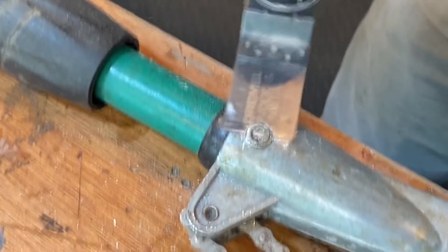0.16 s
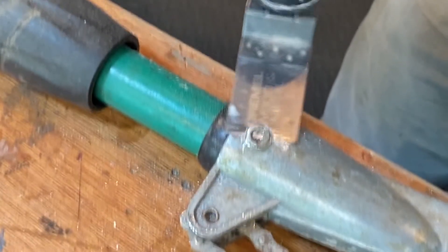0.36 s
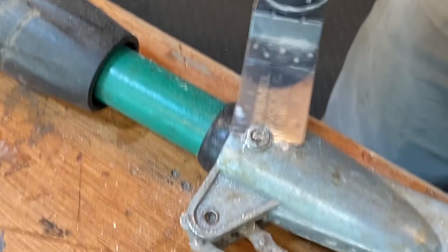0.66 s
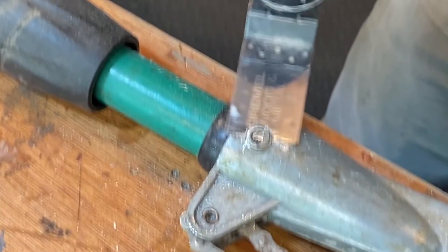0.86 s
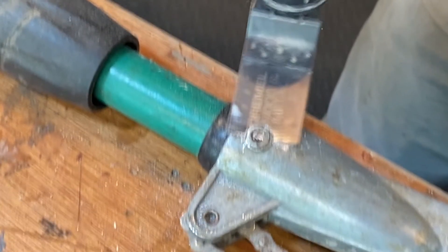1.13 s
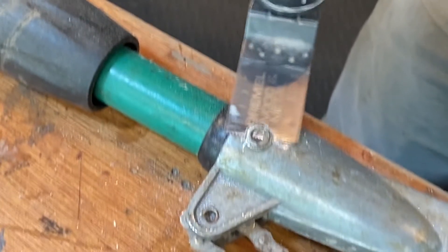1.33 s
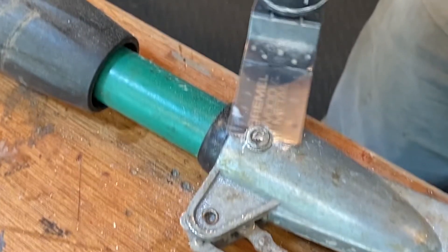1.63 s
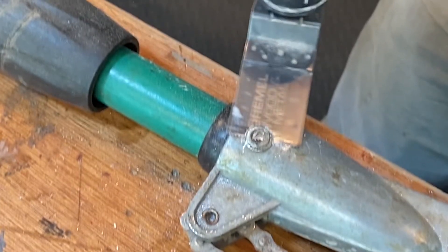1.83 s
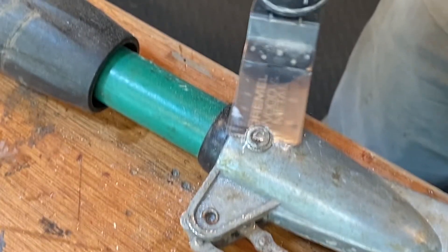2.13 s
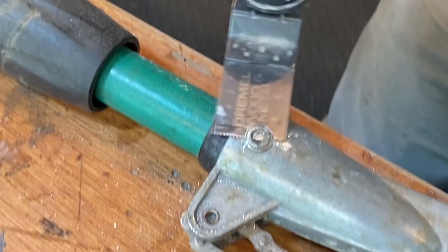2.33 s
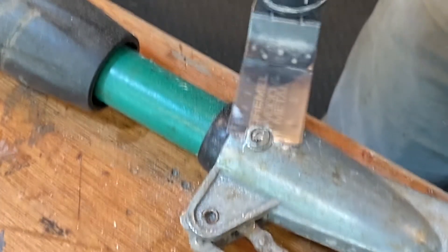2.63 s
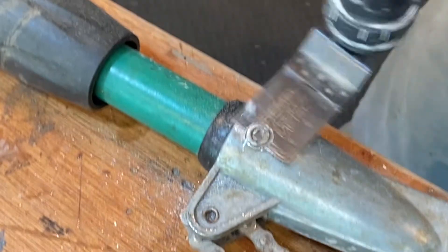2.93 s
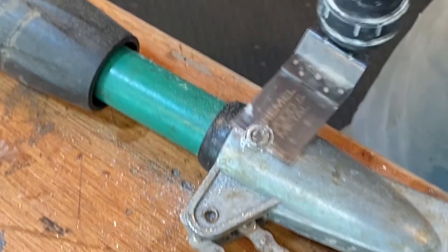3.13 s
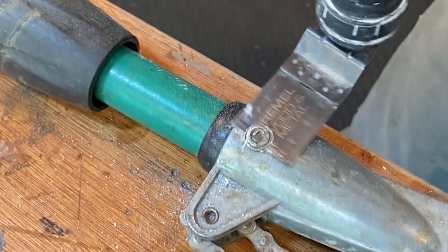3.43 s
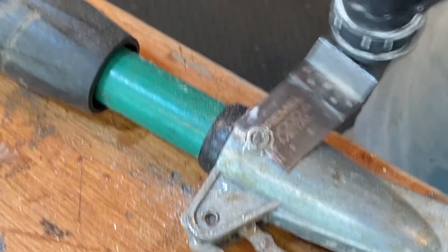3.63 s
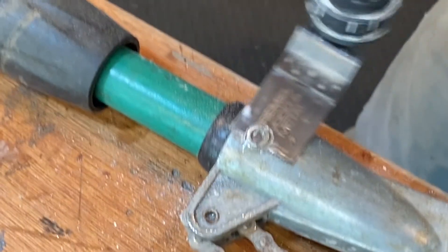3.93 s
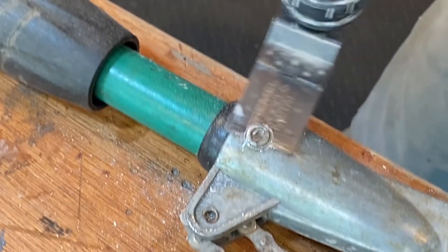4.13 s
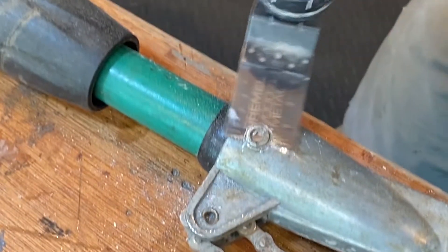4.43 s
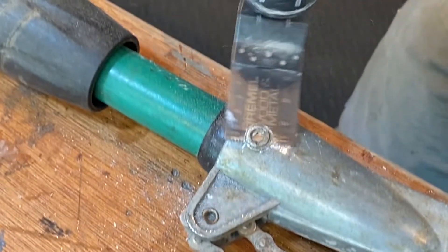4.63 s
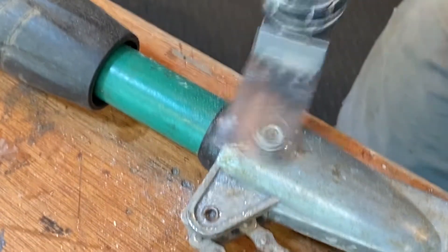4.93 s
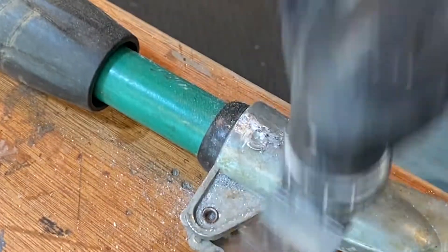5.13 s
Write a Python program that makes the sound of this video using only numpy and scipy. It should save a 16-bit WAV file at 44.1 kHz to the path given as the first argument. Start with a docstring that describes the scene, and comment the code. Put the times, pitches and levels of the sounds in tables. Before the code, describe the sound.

An oscillating power tool saws at a metal pin on a wooden workbench, heard from very close. A low, wavering hum carries a metallic buzz, a gritty rasp and a high sizzling hiss. About halfway through, the blade bites harder and the grinding turns louder and harsher, its pitch sagging and recovering, with a few faint thumps from the bench. At the end the blade lifts off and the sound falls away sharply.

```python
"""An oscillating tool saws a metal pin on a wooden bench, first upright, then tilted and pressed harder.
Each swing of the blade drags teeth over the pin (rasp, hiss and sizzling chips), knocks the workpiece,
its collar and its clamp (buzz) and shakes the bench (hum). Snags make the bench thump, and at the end
the blade lifts off. It is heard close by, and left and right differ in colour and timing."""
import sys
import numpy as np
from scipy import signal
from scipy.fft import rfft, irfft, next_fast_len
from scipy.io import wavfile
from scipy.ndimage import uniform_filter1d

SR = 44100
rng = np.random.default_rng(int(sys.argv[2]) if len(sys.argv) > 2 else 0)


def inscribe(sig):
    """Save sig as 16-bit PCM at rate SR to the path in sys.argv[1].

    A 1-D sig is mono; a 2-D sig holds one channel per row.
    Samples are clipped to [-1, 1] before scaling.
    """
    pcm = np.round(np.clip(np.atleast_2d(sig).T, -1, 1) * 32767)
    wavfile.write(sys.argv[1], SR, pcm.astype(np.int16))


N = 232710
TIME_S = np.arange(N) / SR
TILT_S = 2.981   # the blade is set at a new angle
UPRIGHT, TILTED = 1, 2   # each angle's column in the tables of pitch_hz, upright_db, tilted_db


def from_db(db):
    """Turn decibels into a gain."""
    return 10 ** (np.asarray(db) / 20)


def rms_one(sound):
    """Scale a sound to an average power of 1."""
    return sound / np.sqrt(np.mean(sound ** 2) + 1e-20)


def in_time(rows):
    """Join a table's timed points with lines: one value a sample for each column."""
    times_s, *columns = np.transpose(rows)
    return [np.interp(TIME_S, times_s, column) for column in columns]


def at_pitch(rows, hz, column=1):
    """Read a table between its rows, on a logarithmic pitch scale."""
    rows = np.array(rows)
    return np.interp(np.log(hz + 1), np.log(rows[:, 0] + 1), rows[:, column])


def by_angle(upright, tilted):
    """One value before the blade tilts, another after."""
    return np.where(TIME_S >= TILT_S, tilted, upright)


def drift(rate_hz):
    """A smooth random wobble, about 1 in size."""
    pole = np.exp(-40 * np.pi * rate_hz / SR)   # one step every 20 samples
    slow = signal.lfilter([1], [1, -2 * pole, pole ** 2], rng.standard_normal(N // 20 + 2002))[2000:]
    return np.interp(np.arange(N) / 20, np.arange(len(slow)), rms_one(slow))


# How much louder left is than right: pitch_hz, upright_db, tilted_db
LEFT_LOUDER = [(200, 0.5, 0.7), (380, -3, -3), (700, 7, 3), (1250, 1, -1), (2800, 1, 0), (3800, 10, 4),
               (5000, 14, 8), (6200, 8, 4), (7000, 0, 2), (8200, 0, 0)]
# How far the left channel leads, in steps through the treble: pitch_hz, lead_radians
LEFT_LEAD = [(0, .3), (250, .5), (520, 1.6), (1210, .3), (3530, 1.9), (5250, 1.5), (6030, -1), (7500, -1.6),
             (8000, -3), (8500, -3.3), (10400, -6.1), (11500, -6.4), (12900, -9.3), (13700, -9.5),
             (15500, -12.5)]
def left_right(hz, angle):
    """Each pitch sounds at a different strength and moment on the left and on the right."""
    lead = np.interp(hz, *np.transpose(LEFT_LEAD))
    left = from_db(at_pitch(LEFT_LOUDER, hz, angle) / 2) * np.exp(.5j * lead)
    return np.array([left, 1 / left])


# How alike left and right sound at each pitch: pitch_hz, share_0_to_1
LIKENESS = [(200, .97), (330, .3), (1000, .4), (1250, .75), (3200, .6), (4000, .4), (7500, .55),
            (8200, .92), (9800, .8), (10800, .99), (12000, .65), (13400, .99), (14800, .85), (15600, .96)]
def heard(grit, response, gain):
    """A body colours the grit: one stream sounds on both sides, and each side has one of its own."""
    size = next_fast_len(N + 4096)
    hz = np.arange(size // 2 + 1) * SR / size
    share = np.clip(at_pitch(LIKENESS, hz), 0, 1)
    out = 0
    for angle, active in ((UPRIGHT, TIME_S < TILT_S), (TILTED, TIME_S >= TILT_S)):
        common, *own = rfft(grit * gain * active, size)
        body = response(hz, angle)
        both = left_right(hz, angle)
        common_power = share * np.abs(np.mean(both, axis=0)) ** 2
        own_power = (1 - share) * np.mean(np.abs(both) ** 2, axis=0) / 2
        # the body sets only the colour, not the loudness
        body = body / np.sqrt(np.mean(np.abs(body) ** 2 * (common_power + own_power)))
        mixed = np.sqrt(share) * common + np.sqrt(1 - share) * np.array(own)
        out = out + irfft(mixed * body * both, size)[:, :N]
    return out


def resonances(tones, hz, angle):
    """A metal part answers most strongly near its own tones, which alternate in sign."""
    return sum((-1) ** k * from_db(tone[angle + 1])
               / (1 + 1j * (hz ** 2 - tone[0] ** 2) / (tone[1] * hz + 1)) ** 2
               for k, tone in enumerate(tones))


def buzz(tones, phase, swing_hz, multiples):
    """Even knocks make multiples of the swing rate, loudest near the part's own tones."""
    step = 64   # samples between updates of the colour
    tilted = TIME_S[::step] >= TILT_S
    out, power = 0, 0
    for k in multiples:
        hz = k * swing_hz[::step]
        body = np.where(tilted, resonances(tones, hz, TILTED) * left_right(hz, TILTED),
                        resonances(tones, hz, UPRIGHT) * left_right(hz, UPRIGHT))
        unshared = 1 - np.clip(at_pitch(LIKENESS, hz), 0, 1)
        apart = 1.39 * unshared * drift(2.13)[::step]   # left and right do not keep step
        waver = from_db(2.5 * drift(5)) * np.exp(1j * (.3 + .015 * k) * drift(5))
        body = body * np.exp(1j * apart * [[1], [-1]])
        power = power + np.abs(np.mean(body, axis=0)) ** 2 / 2
        body = np.repeat(body * waver[::step], step, axis=1)[:, :N]
        out = out + (body * np.exp(1j * k * phase)).real
    return out / np.sqrt(uniform_filter1d(np.repeat(power, step)[:N], size=4000))


def shaken(tones, level_db, grit, steady, grit_share):
    """A metal part rings partly from random grit and partly with a steady buzz."""
    grit_share = np.clip(grit_share, 0, .97)
    gain = from_db(level_db)
    grind = heard(grit, lambda hz, angle: resonances(tones, hz, angle), gain * np.sqrt(grit_share))
    return grind + gain * np.sqrt(1 - grit_share) * steady


# The blade snags and the bench jumps: start_s, level_db
SNAGS = [(.66, -34), (2.35, -40), (2.499, -41), (2.979, -26), (3.049, -32), (3.619, -34), (3.72, -41),
         (4.309, -26), (4.6, -42), (5.049, -32), (5.168, -29)]
def bench_thumps(pitch_hz=70, ring_s=0.076):
    """Each snag sets the bench top swinging a few times."""
    kicks = np.zeros(N)
    for start_s, level_db in SNAGS:
        kicks[round(start_s * SR)] = from_db(level_db)
    decay = from_db(-60 / (ring_s * SR))
    turn = 2 * np.pi * pitch_hz / SR
    return signal.lfilter([0, np.sin(turn)], [1, -2 * decay * np.cos(turn), decay ** 2], kicks + 1e-18)


def bench_rumble(rough, rise_s=0.008, fall_s=0.045):
    """A rough cut and every snag shake the bench under the microphone."""
    low_band = signal.butter(3, [55, 110], "band", fs=SR, output="sos")
    middle, side = signal.sosfilt(low_band, rng.standard_normal((2, N)))
    shudder = 0
    for start_s, level_db in SNAGS:
        fade_s = np.where(TIME_S < start_s, rise_s, fall_s)
        shudder = shudder + from_db(level_db - 0.5) * np.exp(-np.abs(TIME_S - start_s) / fade_s)
    gain = (from_db(-70 + 30 * rough) + shudder) * from_db(2.1 * drift(9.9))
    return gain * rms_one(middle + 0.21 * side * [[1], [-1]])


# How the bench answers at twice the swing rate: pitch_hz, upright_db, tilted_db
BENCH_ANSWER = [(208.5, -47, -40), (228.4, -47, -25), (253.4, -43, -44), (279, -49.5, -46),
                (270.5, -46, -41), (298, -50.5, -32), (330, -50, -53)]
def bench_hum(phase, swing_hz, rough, hum_db, third_db):
    """The bench shakes at one, two and three times the swing rate; a rough cut makes it lumpy."""
    second_db = by_angle(at_pitch(BENCH_ANSWER, 2 * swing_hz, UPRIGHT),
                         at_pitch(BENCH_ANSWER, 2 * swing_hz, TILTED)) + 2.0 * drift(9.0)
    out = 0
    for k, level_db in enumerate([hum_db, second_db, third_db], 1):
        wave = np.exp(1j * (k * phase + .5 * rough * drift(32.5)))
        gain = np.sqrt(2) * from_db(level_db + 1.6 * rough * drift(25))
        both = left_right(k * swing_hz, TILTED)   # the hum uses this balance at both angles
        out = out + gain * (wave * both / np.abs(np.mean(both, axis=0))).real
    return out


# How hard the swing knocks the metal: time_s, workpiece_db, collar_db, clamp_db
KNOCK_LEVELS = [(0, -30, -30, -28.5), (.33, -30, -34.5, -33.5), (.5, -28.5, -30, -34),
                (.99, -34.5, -36.5, -35.5), (1.16, -33, -37.5, -33), (1.38, -30.5, -31.5, -32.5),
                (1.51, -28.5, -30.5, -33), (1.71, -38, -39, -31), (1.83, -33.5, -31, -32.5),
                (1.96, -41, -34, -30.5), (2.14, -35, -33.5, -32), (2.31, -40, -33, -29),
                (2.42, -30.5, -33.5, -34), (2.55, -33.5, -28.5, -30.5), (2.72, -29.5, -39.5, -35.5),
                (2.82, -38.5, -27, -33), (2.975, -38, -32, -44), (2.99, -22.5, -28, -24.5),
                (3.05, -23.5, -17.5, -21), (3.11, -21.5, -20.5, -24), (3.2, -22, -18.5, -14.5),
                (3.29, -16.5, -16, -18.5), (3.5, -24.5, -18, -18), (3.56, -30.5, -20.5, -24.5),
                (3.62, -19.5, -20.5, -17), (3.78, -25, -29, -25), (3.93, -26.5, -22, -22.5),
                (4.1, -22, -29, -22), (4.28, -22, -17.5, -16), (4.45, -21, -21, -20.5),
                (4.5, -24, -26, -21), (4.56, -23, -19, -21), (4.63, -22, -23.5, -24),
                (4.9, -28.5, -23.5, -27.5), (4.98, -22, -20.5, -19.5), (5.11, -24, -21.5, -24.5),
                (5.135, -32.5, -40, -42), (5.28, -44, -41, -44)]
def knock_levels(waver_db=1.0):
    """The knocking on each part swells and fades a little by chance."""
    return [level_db + waver_db * drift(11.0) for level_db in in_time(KNOCK_LEVELS)]


# The workpiece's tones: pitch_hz, width_hz, upright_db, tilted_db
WORKPIECE_TONES = [(227, 200, -13, -10), (415, 217, -1, -6), (544, 73, -2.5, -1.5), (677.4, 116, 6.5, 3),
                   (878, 147, 5, 1.5)]
def workpiece_buzz(level_db, knocks, phase, swing_hz, rough):
    """The knocked workpiece rings low, and grinds more when the cut is rough."""
    steady = buzz(WORKPIECE_TONES, phase, swing_hz, multiples=range(4, 10))
    return shaken(WORKPIECE_TONES, level_db, knocks, steady, grit_share=.04 + 1.1 * rough)


# The collar's tones: pitch_hz, width_hz, upright_db, tilted_db
COLLAR_TONES = [(1036, 88, -4, -1.5), (1197, 140, 10.5, 13), (1338, 73, 5.5, 13), (1456, 175, 6, 7)]
def collar_buzz(level_db, knocks, phase, swing_hz, rough):
    """The same knocks ring the collar around the pin at a middle pitch."""
    steady = buzz(COLLAR_TONES, phase, swing_hz, multiples=range(6, 15))
    return shaken(COLLAR_TONES, level_db, knocks, steady, grit_share=.06 + 1.05 * rough)


# The clamp's tones: pitch_hz, width_hz, upright_db, tilted_db
CLAMP_TONES = [(1720, 253, -8.5, 0), (1965, 220, -5, -1.5), (2366, 650, -8, -0.5), (2690, 510, -13.5, -4),
               (3080, 460, -8.5, 1.5)]
def clamp_buzz(level_db, knocks, phase, swing_hz, rough):
    """The clamp rings higher, so less of its sound repeats from swing to swing."""
    steady = buzz(CLAMP_TONES, phase, swing_hz, multiples=range(10, 29))
    return shaken(CLAMP_TONES, level_db, knocks, steady, grit_share=.27 + 1.2 * rough)


# The colour of the sizzle: pitch_hz, upright_db, tilted_db
CHIP_COLOUR = [(11800, -14, -10), (12460, 6.5, 0.5), (13700, 6, 7.5), (14940, 10, 8.5), (16400, -34.5, -5)]
def chip_sizzle(bite_db, teeth, burst_db=12, burst_s=0.06):
    """A harder bite throws more chips; the fresh cut after the tilt spits a burst of them."""
    fresh_cut_db = by_angle(0, burst_db * np.exp(-np.abs(TIME_S - TILT_S) / burst_s))
    level_db = -32 + 1.2 * (bite_db + 28.5) + fresh_cut_db
    return heard(teeth, lambda hz, angle: from_db(at_pitch(CHIP_COLOUR, hz, angle)), from_db(level_db))


# How hard the teeth bite: time_s, level_db
BITE_LEVELS = [(0, -33.5), (.32, -35), (.57, -36), (.64, -37), (.8, -34), (.99, -36.5), (1.09, -26.5),
               (1.17, -24.5), (1.31, -33), (1.36, -35.5), (1.49, -31.5), (1.6, -38.5), (1.71, -28.5),
               (1.83, -37.5), (1.96, -29.5), (2.12, -34.5), (2.3, -25.5), (2.5, -34), (2.6, -29.5),
               (2.7, -33.5), (2.975, -40.5), (2.99, -24.5), (3.05, -21), (3.11, -26.5), (3.2, -20),
               (3.3, -23), (3.5, -19.5), (3.56, -26), (3.61, -19), (3.77, -31), (3.85, -28), (3.89, -23),
               (4.1, -20), (4.2, -27.5), (4.27, -17.5), (4.45, -23), (4.55, -20), (4.61, -31),
               (4.67, -26.5), (4.9, -28), (4.98, -17), (5.11, -27.5), (5.13, -38.5), (5.28, -45)]
def tooth_bite(waver_db=.7):
    """The depth of the bite, with a slight waver, sets how loud the teeth are."""
    return in_time(BITE_LEVELS)[0] + waver_db * drift(2.8)


def scraping(phase, rough, catches_per_s, spread_db, sharpness, return_db, patchy_db):
    """Teeth catch at random, hardest in the middle of each stroke, making three streams of grit."""
    forward = np.exp(sharpness * (1 - .5 * rough) * (np.cos(phase) - 1))
    back = from_db(return_db) * np.exp(sharpness * (-np.cos(phase) - 1))
    depth = from_db(patchy_db * (drift(39) + drift(6.7)))   # some strokes bite deeper
    caught = rng.random(N) < catches_per_s / SR
    strength = from_db(spread_db * np.minimum(rng.exponential(1, N), 5))
    grit = caught * strength * rng.standard_normal((3, N)) * (forward + back) * depth
    power = uniform_filter1d(np.mean(grit ** 2, axis=0), size=6000)
    return grit / np.sqrt(power + 1e-12)


# The colour of the hiss: pitch_hz, upright_db, tilted_db
TOOTH_COLOUR = [(5740, -42, -25), (6280, 9, 4), (7700, 21.5, 11.5), (9000, 27.5, 11.5), (10200, 13.5, 6),
                (9170, -7.5, -8), (10540, 13.5, 9), (12630, 8.5, -1), (12700, -28, -39)]
def tooth_hiss(bite_db, teeth):
    """Thousands of tiny catches on the pin blur into a high hiss."""
    return heard(teeth, lambda hz, angle: from_db(at_pitch(TOOTH_COLOUR, hz, angle)), from_db(bite_db))


# The blade's tones: pitch_hz, width_hz, upright_db, tilted_db
BLADE_TONES = [(3538, 430, 2, 4), (4130, 610, 9, -1), (4716, 380, 8.5, -1.5), (5190, 710, 5, -2.5),
               (5840, 770, 3.5, -6), (6490, 270, 1, -1)]
# How much the blade rings with the bite: time_s, above_hiss_db
RASP_LEVELS = [(0, 5), (.55, 5), (.64, -1), (.85, 4), (1.1, 4.5), (1.2, 2), (1.43, -1), (1.52, 4),
               (1.7, 1.5), (2.12, -4), (2.3, -7), (2.6, -1.5), (2.75, -3.5), (2.9, -1.5), (3.0, 0.5),
               (3.7, 1.5), (3.8, -1.5), (3.88, 1), (4.1, -1), (4.2, 3), (4.28, -1.5), (4.45, 1),
               (4.62, 3.5), (4.9, 2.5), (5.28, -3.5)]
def blade_rasp(bite_db, teeth, phase, swing_hz, rough):
    """The dragging teeth make the blade ring with a bright, gritty rasp."""
    level_db = bite_db + in_time(RASP_LEVELS)[0]
    steady = buzz(BLADE_TONES, phase, swing_hz, multiples=range(24, 44))
    return shaken(BLADE_TONES, level_db, teeth, steady, grit_share=.65 + .8 * rough)


# The swing while upright, tilted, then lifted off and running free:
# time_s, swing_hz, hum_db, third_multiple_db, roughness_0_to_1
SWING_UPRIGHT = [(0.0, 136.9, -17, -38, 0.3), (0.12, 136.9, -22, -49, 0.39), (0.3, 139.5, -18, -40, 0.36),
                 (0.4, 136.3, -21, -45, 0.32), (0.51, 142.7, -16, -35, 0.49), (0.54, 142.8, -18, -49, 0.65),
                 (0.64, 138.6, -17, -32, 0.29), (0.76, 142.4, -18, -49, 0.42),
                 (0.89, 140.1, -21, -39, 0.27), (0.93, 141.3, -20, -55, 0.37), (1.0, 143.9, -20, -35, 0.02),
                 (1.16, 140.7, -21, -43, 0.03), (1.19, 142.7, -21, -57, 0.25),
                 (1.25, 139.0, -18, -46, 0.11), (1.36, 142.6, -23, -38, 0.35),
                 (1.46, 145.2, -21, -50, 0.19), (1.67, 146.4, -29, -61, 0.05),
                 (1.98, 145.5, -26, -48, 0.06), (2.04, 149.5, -34, -51, 0.04),
                 (2.21, 147.9, -29, -41, 0.02), (2.28, 145.3, -33, -62, 0.37),
                 (2.37, 144.8, -24, -43, 0.38), (2.47, 134.5, -17, -36, 0.7), (2.5, 136.0, -29, -39, 0.78),
                 (2.56, 142.5, -20, -38, 0.57), (2.74, 138.9, -17, -47, 0.31),
                 (2.85, 152.0, -27, -45, 0.06), (2.87, 150.0, -42, -53, 0.02), (2.98, 139.0, -22, -46, 0.3)]
SWING_TILTED = [(2.98, 116, -41, -28, 0.086), (3.14, 114, -17.5, -32, 0.43), (3.2, 144.1, -18.5, -30, 0.52),
                (3.25, 142.8, -15, -34, 0.19), (3.29, 126.9, -16.5, -43, 0.52),
                (3.33, 123.7, -20, -26, 0.32), (3.41, 146.1, -24, -30, 0.02), (3.45, 151, -29, -45, 0.28),
                (3.58, 152.5, -36, -37, 0.027), (3.62, 144.8, -22.5, -29, 0.27), (3.72, 108, -24, -53, 0.5),
                (3.76, 104, -21.5, -48, 0.19), (3.93, 116.0, -19.5, -36, 0.027),
                (4.05, 113.7, -14, -50, 0.091), (4.15, 113.1, -12.5, -23, 0.019),
                (4.21, 121.3, -19.5, -39.5, 0.57), (4.33, 118.9, -19, -24, 0.44),
                (4.45, 136.7, -25.5, -26.5, 0.047), (4.53, 133.2, -22, -22, 0.18),
                (4.58, 114.2, -18, -31, 0.19), (4.75, 130.1, -22, -30, 0.077),
                (4.87, 124.5, -18, -39, 0.02), (4.94, 127.2, -21, -24.5, 0.17),
                (5.03, 117.9, -16, -38, 0.69), (5.13, 119.4, -22.5, -34, 0.74)]
SWING_FREE = [(5.155, 135, -36, -44, .6), (5.19, 165, -43, -45, .15), (5.28, 177, -50, -48, .04)]
def blade_swing():
    """The motor swings the blade to and fro; a rough cut makes its speed unsteady."""
    swing_hz, hum_db, third_db, rough = in_time(SWING_UPRIGHT + SWING_TILTED + SWING_FREE)
    unsteady_hz = swing_hz * (1 + .01 * rough * drift(25))
    phase = 2 * np.pi * np.cumsum(unsteady_hz) / SR
    return phase, swing_hz, rough, hum_db, third_db


def scene():
    """Workpiece, collar, clamp, blade, teeth, chips and bench share one swing."""
    workpiece_db, collar_db, clamp_db = knock_levels()
    bite_db = tooth_bite()
    phase, swing_hz, rough, hum_db, third_db = blade_swing()
    knocks = scraping(phase, rough, catches_per_s=9000, spread_db=1.5,
                      sharpness=0.55, return_db=7.5, patchy_db=0.5)
    teeth = scraping(phase + 0.83, rough, catches_per_s=12000, spread_db=2.0,
                     sharpness=1.17, return_db=5.5, patchy_db=1.39)
    workpiece = workpiece_buzz(workpiece_db, knocks, phase, swing_hz, rough)
    collar = collar_buzz(collar_db, knocks, phase, swing_hz, rough)
    clamp = clamp_buzz(clamp_db, knocks, phase, swing_hz, rough)
    blade = blade_rasp(bite_db, teeth, phase, swing_hz, rough)
    hiss = tooth_hiss(bite_db, teeth)
    sizzle = chip_sizzle(bite_db, teeth)
    bench = bench_hum(phase, swing_hz, rough, hum_db, third_db) + bench_rumble(rough) + bench_thumps()
    return bench + workpiece + collar + clamp + sizzle + hiss + blade


def record(dry, bass_hz=45.0, top_hz=16200):
    """The microphone drops the deepest bass; peaks past full scale clip, and the top treble is cut."""
    thinned = signal.sosfilt(signal.butter(2, bass_hz, "high", fs=SR, output="sos"), dry)
    clipped = np.clip(thinned, -1, 1)
    return signal.sosfilt(signal.cheby2(24, 60, top_hz, fs=SR, output="sos"), clipped)


dry = scene()
out = record(dry)
inscribe(out)
```